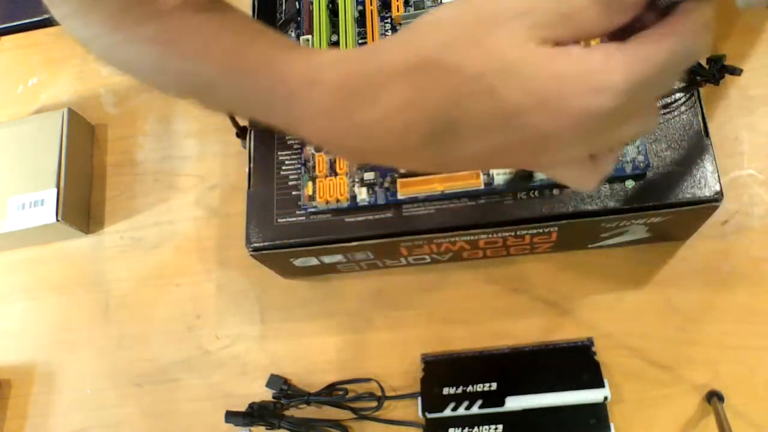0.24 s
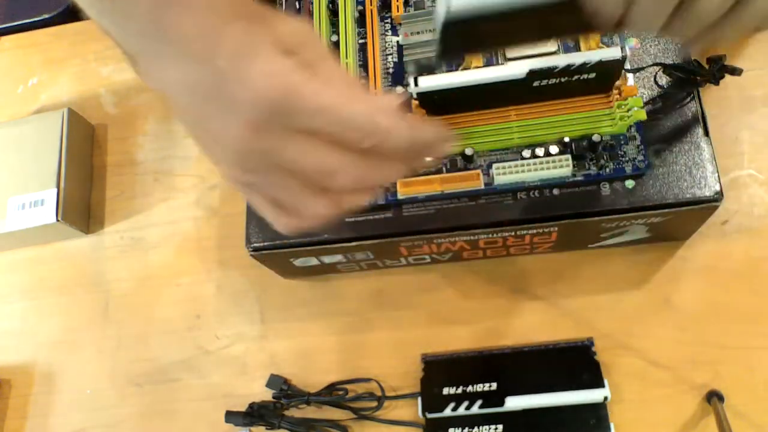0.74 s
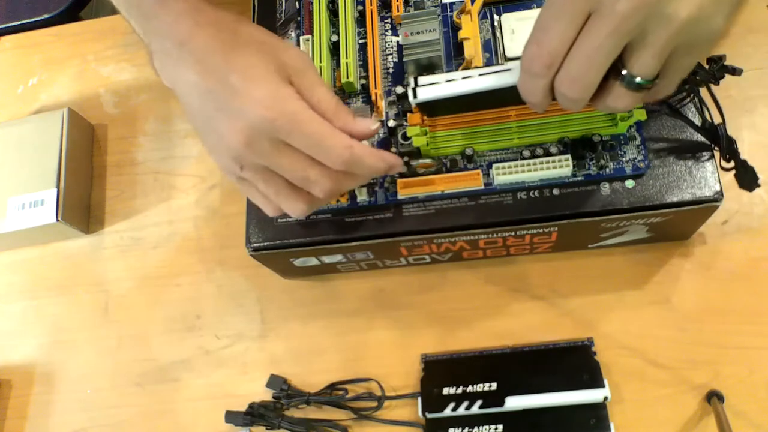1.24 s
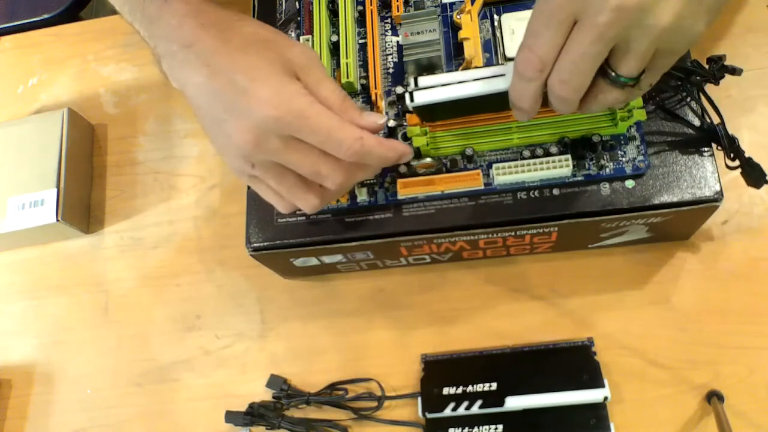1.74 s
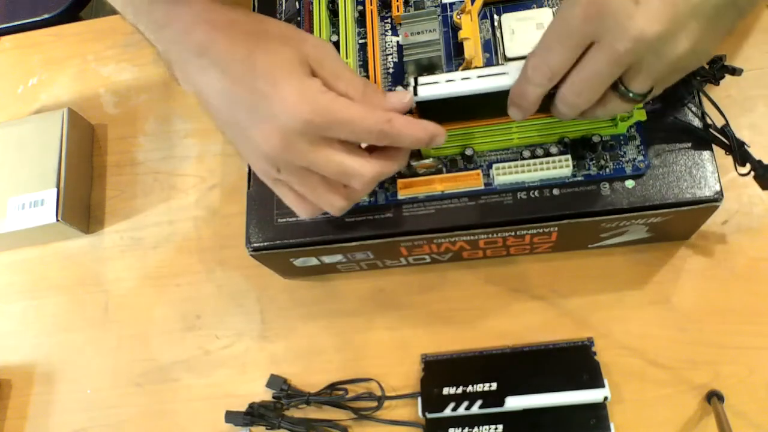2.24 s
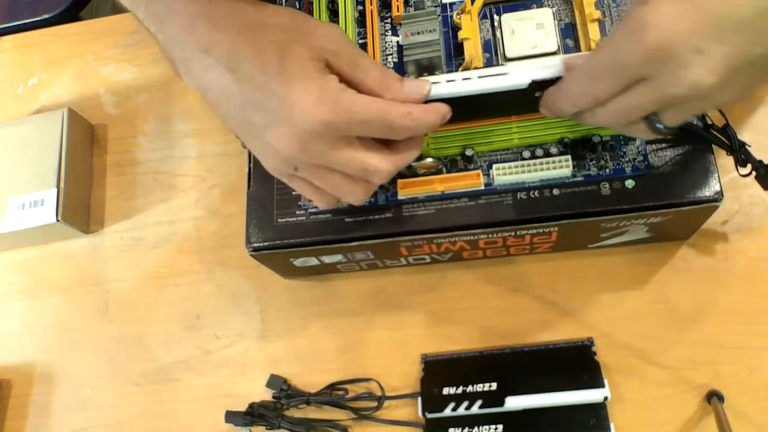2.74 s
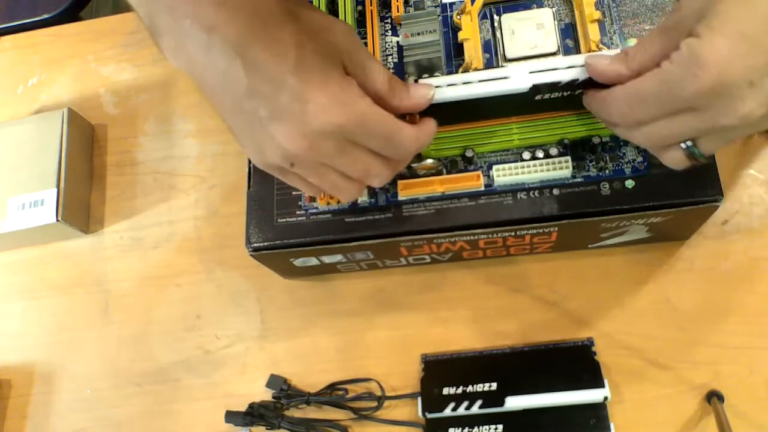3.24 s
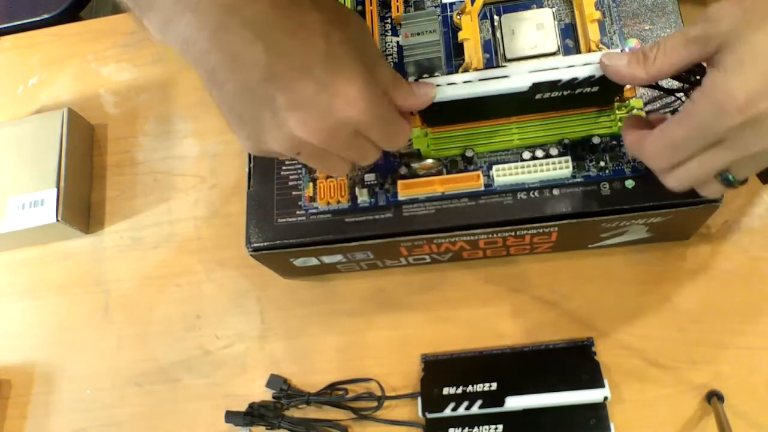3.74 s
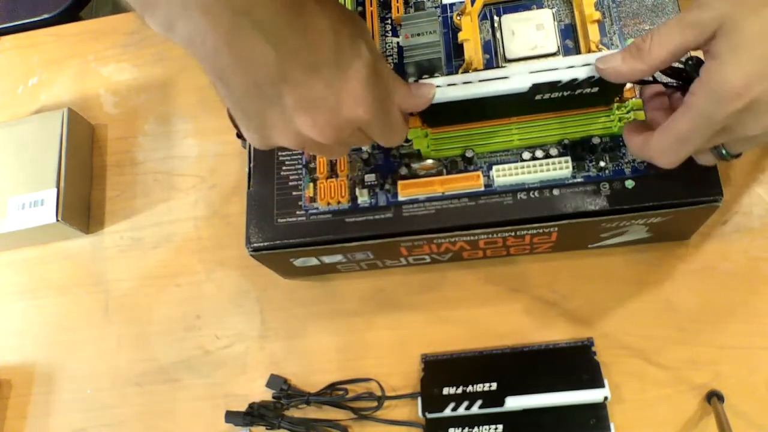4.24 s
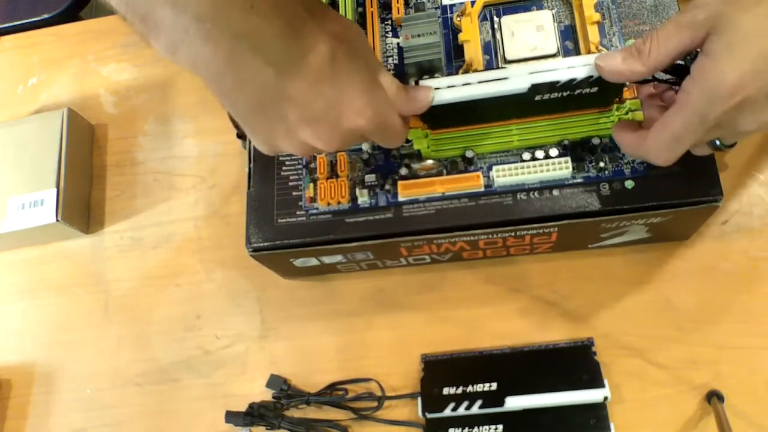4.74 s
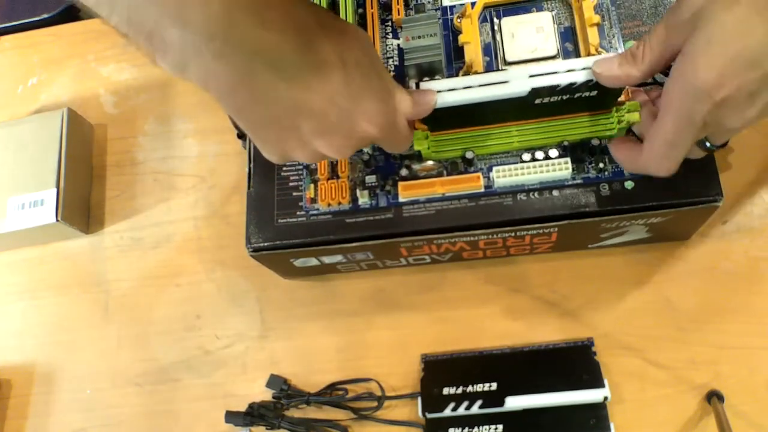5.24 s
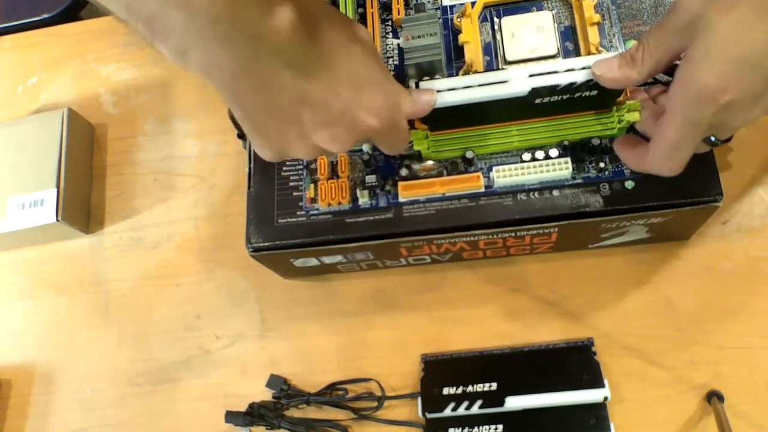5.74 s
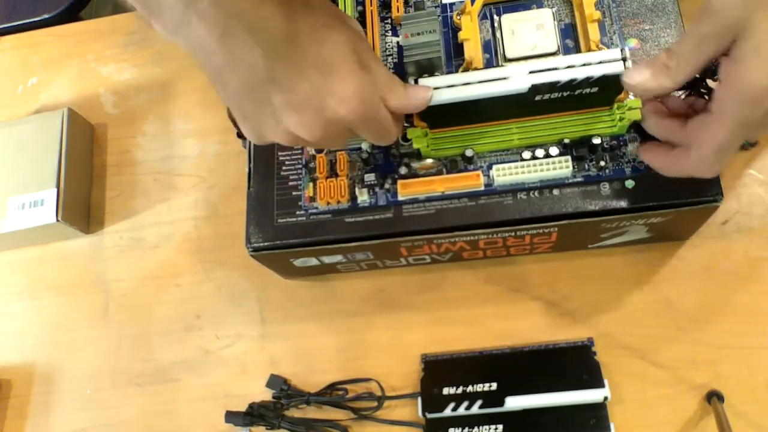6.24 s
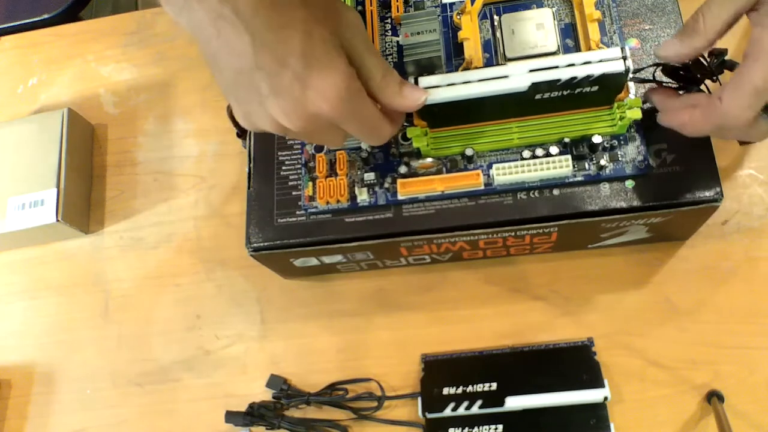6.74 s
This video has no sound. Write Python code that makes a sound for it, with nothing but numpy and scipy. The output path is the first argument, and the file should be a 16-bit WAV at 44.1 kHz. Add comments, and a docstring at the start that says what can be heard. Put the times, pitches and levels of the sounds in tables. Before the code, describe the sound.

Hands work over a board resting on a hollow cardboard box. After sparse ticks and low table thuds, hard edges click, scrape and rattle in a slot; a brief pause holds only faint skin rubbing. Pressing brings a bright crack, a smaller click and two crisp latch snaps, then delicate light ticks. The microphone is near, the small room nearly dead, with low steady hiss.

```python
"""A memory module is lowered into a plastic slot of a circuit board that lies on a cardboard box.
First edges tick and scrape while the loose module rattles (1.25-2.25 s), then fingertips squeak along it
(2.7-3.4 s); it is pushed home and latches snap (4.4-5.4 s); light ticks follow. Cracks and rubbing noise
ring six resonant bodies, cracks get a small quiet room's answer; damped sines make the box boom.
Throughout, hands thud through the table, over noise room tone and two faint sine tones."""
import sys
import numpy as np
from scipy.fft import rfft, irfft, next_fast_len
from scipy.io import wavfile
from scipy.ndimage import map_coordinates

SR = 44100
rng = np.random.default_rng(int(sys.argv[2]) if len(sys.argv) > 2 else 0)


def unload_audio(sound):
    """Save the sound as a 16-bit wav file, at the path given as the first command line argument."""
    columns = np.transpose(np.atleast_2d(sound))
    # keep every value between -1 and 1, then stretch to whole-number steps
    steps = np.round(np.clip(columns, -1, 1) * 32767)
    wavfile.write(sys.argv[1], SR, steps.astype(np.int16))


N = 308700


def amp(db):
    """Gain of a level in dB."""
    return 10 ** (np.asarray(db) / 20)


def unit(x):
    """x at rms 1."""
    return x / np.sqrt(np.mean(x ** 2) + 1e-20)


def along(points, hz):
    """(f/Hz, value) points interpolated on a log frequency axis."""
    f, v = np.transpose(points)
    return np.interp(np.log(hz + 1), np.log(f + 1), v)


def curves(rows):
    """One value per sample for each column after the time."""
    s, *cols = np.transpose(rows)
    return [np.interp(np.arange(N) / SR, s, c) for c in cols]


def wobble(knots_per_s):
    """Smooth random curve through normally distributed knots."""
    knots = rng.standard_normal(int(N * knots_per_s / SR) + 4)
    return map_coordinates(knots, [np.arange(N) * knots_per_s / SR])


def filtered(x, response):
    """x times a complex response of frequency."""
    m = next_fast_len(N + SR // 2)
    return irfft(rfft(x, m) * response(np.fft.rfftfreq(m, 1 / SR)), m)[..., :N]


def noise(spectrum):
    """Noise of rms 1 coloured by (f/Hz, relative level/dB) points."""
    return unit(filtered(rng.standard_normal(N), lambda hz: amp(along(spectrum, hz))))


def ring(force, modes):
    """Resonant body, modes (f/Hz, width/Hz, relative level/dB): white force of rms 1 comes out at rms 1."""
    def body(f):
        h = 0
        for k, (center, width, db) in enumerate(modes):
            resonance = 1j * f * width / (center * center - f * f + 1j * f * width)
            h = h + (-1) ** k * amp(db) * resonance
        # fast fade above the last mode and below the first
        h = h / (1 + 1j * f / modes[-1][0]) ** 2 * f / (f - .6j * modes[0][0])
        return h / np.sqrt(np.mean(np.abs(h) ** 2))
    return filtered(force, body)


def body_levels_db(lid_db, box_db, board_db, bright_db):
    """Force shares of lid, box, board, slot, module, edges; brightness trades slot against edges."""
    edge_tilt = 1.2  # edges move more with brightness than the slot
    return np.array([lid_db, box_db, board_db, -bright_db, 0, edge_tilt * bright_db])


def contacts():
    """Impact forces on the six bodies: a short noise crack, then the room's diffuse answer."""
    # contacts: t/s, level/dB before coupling, then above it lid/dB, box/dB, board/dB, brightness/dB,
    # 60 dB decay/s (2 ms at least)
    hits = [(0.1273, -28, -46, -34, -31.5, -5, 0.012), (0.4961, -58, -11, -11, -9, -8, 0.014),
            (0.567, -58.5, -20, -7, -10, -8, 0.012), (0.7324, -56, -12, -24, -17, 6, 0.013),
            (0.7923, -60, -8, -4, -9, -9, 0.011), (0.841, -28, -13, -9.5, -9, -3.5, 0.02),
            (1.1089, -35, -35, -26, -15.5, -4, 0.028), (1.142, -50.5, -12, -2, -0.5, -13, 0.0049),
            (1.2856, -41, -9.5, -13, -16, 4, 0.029), (1.2962, -46, -11, -4, -4, -1, 0.0087),
            (1.3372, -56.5, 3, 6.5, -6, -10, 0.017), (1.4037, -55, -5, 0, -18, -9, 0.012),
            (1.4538, -58, -5, -2, -11, -4, 0.011), (1.5358, -41, -24, -28, -26, 2.5, 0.018),
            (1.5568, -33, -12, -34, -21, -1.5, 0.014), (1.6819, -36, -13, -2, -26, -12.5, 0.024),
            (1.705, -30, -5, -15, -22, -3.5, 0.028), (1.8168, -53, -8, -11, -19, -7, 0.013),
            (1.9124, -31.5, -7.5, 3, -19, -1, 0.022), (2.0338, -32, -34, -29, -22, 5, 0.022),
            (2.1691, -45.5, -6, -5, -9, 0, 0.031), (2.1953, -51, -4, -3, -1, -7, 0.022),
            (2.582, -29, -7, -5, -13, -3.5, 0.031), (2.6756, -58, 10, -12, -5, -18, 0.007),
            (2.935, -49.5, -19, -1.5, -18, -7.5, 0.0074), (3.026, -51, 0, 0, 7, -12, 0.0084),
            (3.0714, -53.5, 3.5, -13, -7, -1, 0.0082), (3.2625, -52.5, -5, -8, -5, -7, 0.02),
            (3.366, -44, -3, -5, -7, -1, 0.033), (3.4413, -52, 3, -11, -15, -10, 0.011),
            (3.4704, -42.5, -11, -12, -17, 0.5, 0.031), (3.5743, -59, 4, -4, -6, -7, 0.0095),
            (3.758, -41.5, 3, -9, -19, -1, 0.019), (4.0531, -57, -16, -6, 1, -2, 0.01),
            (4.0769, -52, -6, -5.5, 0.5, -15, 0.026), (4.3899, -12, -16.5, -6, -13.5, -1, 0.012),
            (4.4208, -25, -5, -7.5, -11, -4, 0.015), (4.456, -41, -13, -9, -10, -8, 0.015),
            (4.4672, -41.5, -3, 2, -3, -8, 0.017), (4.6274, -54.5, -17, -8, 2, -9, 0.018),
            (4.7062, -52, -4, -20, -2, -6, 0.015), (4.774, -53, -9, -6, -3.5, -7, 0.013),
            (4.8775, -23.5, -7, -20, -15, -2.5, 0.021), (4.9021, -37.5, -5, 2, -1, -5, 0.011),
            (4.9505, -40, -20, -15, -20, -4, 0.026), (4.9831, -49.5, 0, 3, 5.5, -8, 0.016),
            (5.0674, -12, -23, -13.5, -10.5, -1, 0.023), (5.1894, -51.5, -15, -17, 4, -12.5, 0.0075),
            (5.251, -43.5, -13, -19, -7, -11.5, 0.017), (5.2585, -40.5, 0, -15, -11, 1.5, 0.012),
            (5.3387, -13, -27, -15.5, -9, 1, 0.024), (5.4307, -48, -1, -14, -16, -2, 0.012),
            (5.4826, -55.5, -8, -3, 2.5, -15, 0.012), (5.5294, -51.5, -18, -20, -6, -4, 0.013),
            (5.563, -54, 4.5, -10, -4, -3, 0.0089), (5.6156, -62, 7, -11, 5, 0, 0.0096),
            (5.671, -53, -19, -11.5, -1, -10, 0.0082), (5.6974, -64, 4, 1, 11, -5, 0.0064),
            (5.7242, -48, -15, -23, -31, 4, 0.0065), (5.7488, -52.5, -13, -10, -18, 11, 0.011),
            (5.7814, -58, -18, -26, -24, 13, 0.0067), (5.789, -43, -31, -29, -29, 4.5, 0.0059),
            (5.8015, -39.5, -35, -12.5, -6, -6, 0.023), (5.823, -43, -26, -17, -18, 4, 0.0083),
            (5.884, -59, -8, -14, -2, 8, 0.011), (6.014, -49, -30, -25, -11.5, 5.5, 0.0063),
            (6.0382, -56.5, -17, -19, -23, 5, 0.011), (6.1382, -61, 1, -1, 6, -6, 0.012),
            (6.183, -51, -17, -19, -24, -1.5, 0.0098), (6.4307, -57.5, 4, -0.5, 0, -15, 0.011),
            (6.5122, -58, 12.5, -20, -18, -15, 0.0098), (6.919, -41.5, -27, -16, -10.5, -6, 0.0076),
            (6.9456, -61, -12, -9, -2, -6, 0.011)]
    # room answer per body, lid to edges: t60/s, sample level over crack norm/dB
    room = [(0.14, -28.5), (0.17, -37.5), (0.15, -39), (0.16, -34), (.2, -42), (0.22, -43)]
    # how well a blow drives each body, lid to edges: level/dB
    coupling_db = [19, 24.3, 18.95, 2.67, 6.3, 4.06]
    # impulse added to the first sample of a crack, per body: amplitude [noise rms]
    shove = [4.7, 7.7, 6.7, 4, 3.1, 3.5]

    force, t = np.zeros((6, N + SR)), np.arange(SR // 3) / SR
    t60_s, wet_db = np.transpose(room)[:, :, None]
    for s, db, lid_db, box_db, board_db, bright_db, decay_s in list(hits) + fidgets():
        crack, answer = rng.standard_normal((2, 6, len(t)))
        crack *= amp(-60 * t / max(decay_s, .002))
        crack[:, 0] += shove
        crack /= np.linalg.norm(crack, axis=1, keepdims=True)
        answer *= amp(wet_db - 60 * t / t60_s)
        answer *= np.clip((t - .005) / 0.0005, 0, 1)  # arrives after the nearest surfaces
        size = amp(db + body_levels_db(lid_db, box_db, board_db, bright_db) + np.array(coupling_db))
        force[:, round(s * SR):][:, :len(t)] += size[:, None] * (crack + answer)
    return force[:, :N]


def fidgets():
    """Faint contacts at random times, with random body shares."""
    rate_per_s, level_db, spread_db = 3, -71, 4.5  # level before coupling
    u = rng.random((round(rate_per_s * N / SR), 6))
    return [(a * (N - 1) / SR, level_db + spread_db * (2 * b - 1),
             12 * c - 12, 12 * d - 12, 12 * e - 10, 8 * f - 8, .008)
            for a, b, c, d, e, f in u]


def stroke(start_s, rise_s, length_s):
    """Pressure of one rubbing stroke: bites, fades a little along its length, lets go."""
    let_go_s, fade_db = 0.013, 5.5
    t = np.arange(N) / SR - start_s
    bite = t / max(rise_s, .001)
    let_go = (length_s - t) / let_go_s + 1
    ends = np.clip(np.minimum(bite, let_go), 0, 1)
    return ends ** 2 * amp(-fade_db * np.clip(t / length_s, 0, 1))


def slides():
    """Sliding edges stick and slip: clumped grains of force on the same six bodies."""
    # edges sliding in the slot: start/s, rise/s, length/s, level/dB,
    # then above it lid/dB, box/dB, board/dB, brightness/dB
    strokes = [(0.131, 0.0079, 0.03, -61, -11, -18, -6, -2.5),
               (0.227, 0.019, 0.056, -73.5, 4, -8, -11, 1.5),
               (1.282, 0.0017, 0.025, -63, 15, 8.5, 8.5, -13),
               (1.324, 0.016, 0.064, -76.5, 24, 15, 14, -11), (1.389, .02, 0.063, -69.5, 16, 16, 7.5, -7),
               (1.55, 0.0046, 0.049, -65, -2, 10.5, 6.5, -3.5),
               (1.629, 0.026, 0.053, -61.5, 3, -12, 4.5, -3), (1.673, 0.0038, 0.044, -51, 14, 9, 2.5, -2),
               (2.015, 0.024, 0.028, -41, -25, -4.5, -1, -1), (2.045, .012, 0.049, -44.5, -9, 1, -6, -2),
               (2.098, 0.0072, 0.058, -51, -12, 6, -3.5, -3), (2.567, 0.0089, 0.023, -58, -6, 17, 9, -5),
               (3.418, 0.045, 0.062, -64.5, 8, 10.5, 4, -1), (4.312, .008, 0.076, -77.5, 1, 5, 11, -1),
               (4.379, 0.0082, 0.041, -37, 10, 9.5, 3.5, 0.5), (4.413, .006, 0.024, -50.5, 7, 3, 10, -3),
               (5.81, 0.036, 0.063, -70, -8, 2, 11, -3), (6.249, .006, 0.033, -65.5, -2, 1.5, 2, -1.5),
               (6.907, 0.015, 0.078, -73.5, -2, 15, 10, -6.5)]
    rub_top_hz = 12950  # grains are too soft to reach above this

    clumps = amp(1.8 * wobble(150) + 3.5 * wobble(450))
    grains = clumps * rng.standard_normal((6, N)) / np.sqrt(np.mean(clumps ** 2))
    grains = grains * amp([2 * wobble(45) for _ in grains])  # the grip wanders from body to body
    pressure = np.zeros((6, N))
    for s, rise_s, length_s, db, lid_db, box_db, board_db, bright_db in strokes:
        size = amp(db + body_levels_db(lid_db, box_db, board_db, bright_db))
        pressure += size[:, None] * stroke(s, rise_s, length_s)
    return filtered(pressure * grains, lambda hz: 1 / (1 + (hz / rub_top_hz) ** 8))


def squeaks():
    """Skin rubbing smooth metal excites narrow and broad bands, each coming and going on its own."""
    # fingertip strokes along the module: start/s, rise/s, length/s, level/dB
    rubs = [(2.682, .01, 0.092, -67.5), (2.91, 0.019, .03, -68), (2.951, 0.018, 0.039, -66),
            (3.182, 0.012, 0.11, -69.5), (3.246, 0.09, 0.097, -57.5)]
    # bands excited by the fingertip: f/Hz, width/Hz, relative level/dB
    skin = [(407, 40, -2), (810, 130, -5), (2350, 160, -8.5), (3030, 380, -14.5), (3690, 190, -9.5),
            (4550, 160, -11), (6460, 2300, -15), (9000, 2000, -10.5)]

    rub = sum(amp(db) * stroke(s, rise_s, length_s) for s, rise_s, length_s, db in rubs)
    rub = rub * amp(2 * wobble(60))
    out = np.zeros(N)
    for hz, width_hz, db in skin:
        force = rub * amp(4.5 * wobble(25.04)) * rng.standard_normal(N)
        out += amp(db) * ring(force, [(hz, width_hz, 0)])
    return out


def pushes():
    """A fingertip presses: one soft heavily damped sine swing of the box lid."""
    # soft pushes that only the box feels: t/s, initial level/dB, f/Hz
    presses = [(0.725, -39.5, 52), (1.389, -36.5, 102), (2.543, -44.5, 50.4), (2.691, -37, 88),
               (2.791, -65, 78), (3.393, -43.5, 54), (3.518, -44, 50), (3.666, -42, 73.5),
               (3.695, -43, 144), (4.388, -19.5, 241), (4.875, -31, 128), (5.279, -38.5, 94.2),
               (5.297, -35, 56.6), (5.57, -50, 52), (5.691, -70, 70.6), (6.133, -46.5, 200),
               (6.507, -53, 52.2)]
    out, t = np.zeros(N + SR), np.arange(SR // 5) / SR
    for s, db, hz in presses:
        decay = amp(db - 60 * t * hz / 7)  # 60 dB in 7 cycles
        out[round(s * SR):][:len(t)] += decay * np.sin(2 * np.pi * hz * t)
    return out[:N]


def hands():
    """Lumpy noise: thuds through the table, a shuffle and a low creak of the loaded box."""
    # hands on table and box: t/s, table thud/dB, shuffle/dB, box creak/dB
    work = [(0.0, -49, -73, -71.5), (0.27, -59.5, -66.5, -71.5), (0.62, -47, -70, -67.5),
            (0.64, -41, -63.5, -67), (0.88, -50, -61.5, -65), (1.42, -60.5, -74, -65.5),
            (2.05, -55, -64, -60), (2.26, -65.5, -70.5, -63.5), (2.59, -50.5, -61, -69),
            (3.12, -68, -64, -66.5), (3.51, -53, -59, -63.5), (3.82, -65, -57, -61.5), (3.9, -52, -59, -57),
            (3.98, -61, -63.5, -67), (4.19, -58.5, -62.5, -66), (4.29, -67, -68, -69.5),
            (4.48, -42.5, -74, -63), (4.62, -66.5, -65, -68), (5.26, -53, -56, -57.5),
            (5.52, -51.5, -58, -61), (5.57, -42.5, -63, -69), (5.77, -58, -61.5, -72),
            (6.06, -55, -68, -66), (6.43, -57, -63.5, -70), (6.94, -60, -70, -71), (7.0, -73, -71, -72)]
    # table thud spectrum: f/Hz, relative level/dB
    thud_spectrum = [(8, -3), (15, 4), (40, 0), (70, -32), (120, -44), (400, -120)]
    shuffle_spectrum = [(30, -25), (55, 7.0), (100, 1.5), (150, -3.5), (300, -41), (900, -120)]
    creak_spectrum = [(80, -43.0), (150, -4.5), (250, -2.5), (420, -9.5), (900, -21.5),
                      (2000, -31.0), (5000, -120)]

    thud_db, shuffle_db, creak_db = curves(work)
    thud = unit(amp(1.65 * wobble(17)) * noise(thud_spectrum))
    shuffle = unit(amp(2.24 * wobble(37) + 2.2 * wobble(6.4)) * noise(shuffle_spectrum))
    creak = unit(amp(3.5 * wobble(25) + 1.5 * wobble(6.1)) * noise(creak_spectrum))
    return amp(thud_db) * thud + amp(shuffle_db) * shuffle + amp(creak_db) * creak


def air():
    """Steady coloured-noise room tone with two faint sine tones."""
    # room tone spectrum: f/Hz, relative level/dB
    air_spectrum = [(35, -16), (60, -7), (168, -54), (222, -19.5), (427, -17.5), (621, -19.5), (803, -17.5),
                    (1470, -20), (1820, -25), (2410, -26.5), (4220, -30), (14600, -34), (16000, -43)]
    # faint electronic tones: f/Hz, peak level/dB
    whine = [(6000, -93.5), (12000, -91.5)]
    air_rms_db = -70.5
    t = np.arange(N) / SR
    tones = sum(amp(db) * np.sin(2 * np.pi * hz * t) for hz, db in whine)
    return amp(air_rms_db) * noise(air_spectrum) + tones


def scene():
    """Forces ring the six bodies, over hands and room tone; the module rattles until it grips."""
    # modes of each body: f/Hz, width/Hz, relative level/dB
    lid = [(115, 30, -14), (184.2, 28, -6)]  # box lid
    box = [(290, 49, 1), (329.7, 30, 2.5), (404, 65, 2)]  # box walls and air
    board = [(459, 4.4, 0.5), (528, 110, -3.5), (619, 73, 1.5), (749, 70, 1), (827, 50, 1), (905, 47, -4),
             (1110, 110, -5)]  # circuit board
    slot = [(1353, 310, 3), (1529, 160, 7), (1795, 450, 2), (2333, 410, -0.5)]  # slot walls
    module = [(2594, 236, -0.5), (3094, 280, -0.5), (3603, 265, -1), (4060, 260, -1.5), (4795, 300, -2.5),
              (5380, 340, -8.5)]  # memory module
    edge = [(5550, 2650, -2.5), (7040, 190, -5), (7140, 1140, -9.5), (9173, 2250, 3.5), (9945, 2450, 2.5),
            (11830, 2600, -19)]  # contact edges
    loose = [(853, 56, -1), (1485, 100, 1), (3050, 340, -9)]  # module standing loose in the slot
    loose_from_s, loose_to_s, loose_db = 1.25, 2.25, -2

    force, t = contacts() + slides(), np.arange(N) / SR
    bodies = sum(ring(f, modes) for f, modes in zip(force, (lid, box, board, slot, module, edge)))
    is_loose = (t > loose_from_s) * (t < loose_to_s)
    rattle = amp(loose_db) * ring(force[3] * is_loose, loose)  # driven by the slot force
    return (bodies + rattle + squeaks() + pushes() + hands() + air())[None]


def record(dry):
    """Band limit: 18 dB down above 15.7 kHz, nothing from the top frequency up."""
    shelf_hz, top_hz = 15700, 16400
    return filtered(dry, lambda hz: (hz < top_hz) * amp(-18 * (hz > shelf_hz)))


dry = scene()
out = record(dry)
unload_audio(out)
```